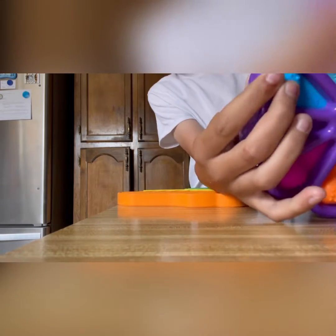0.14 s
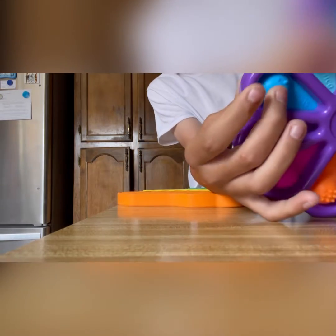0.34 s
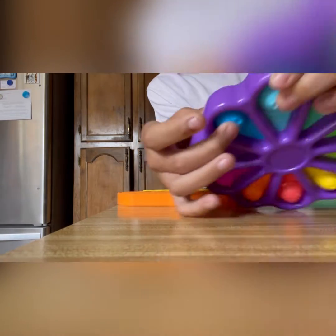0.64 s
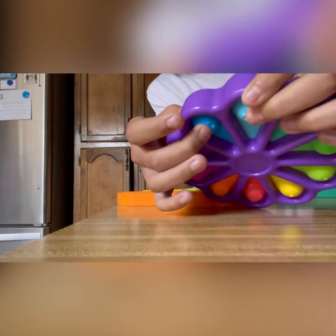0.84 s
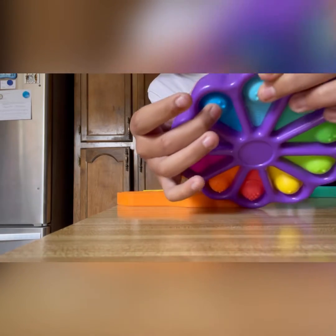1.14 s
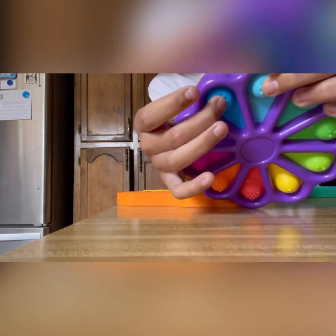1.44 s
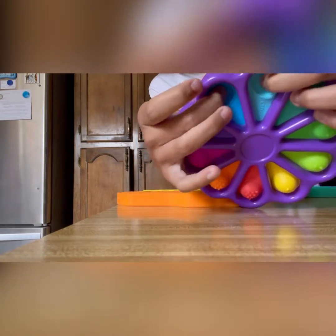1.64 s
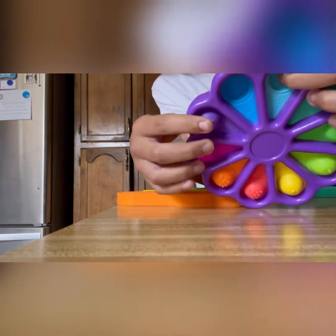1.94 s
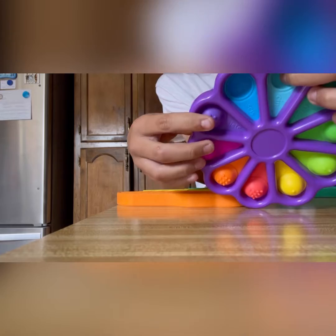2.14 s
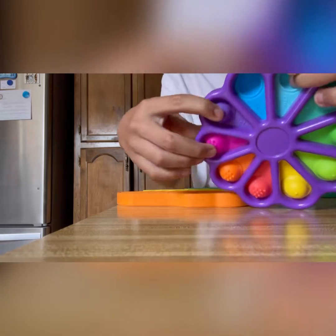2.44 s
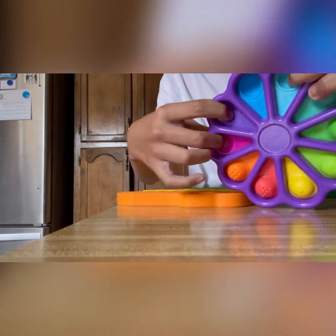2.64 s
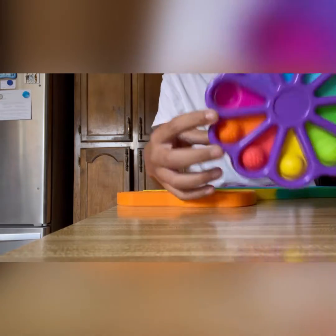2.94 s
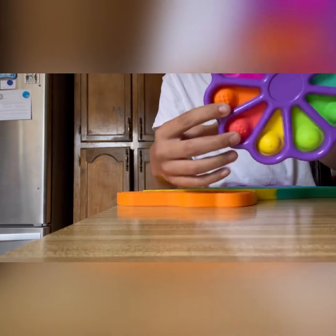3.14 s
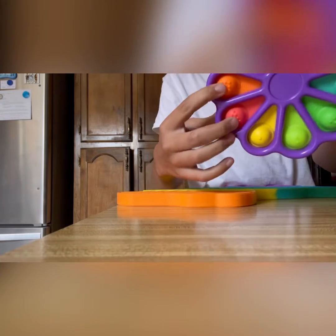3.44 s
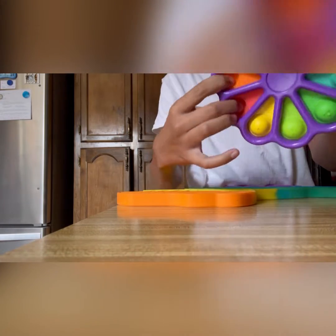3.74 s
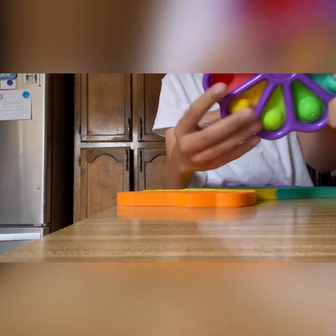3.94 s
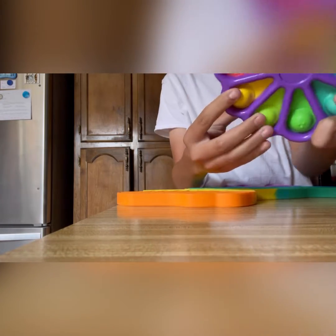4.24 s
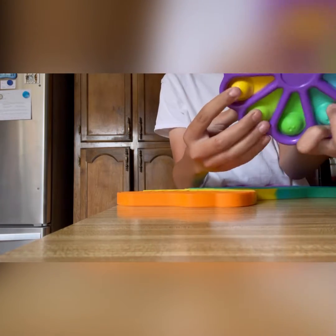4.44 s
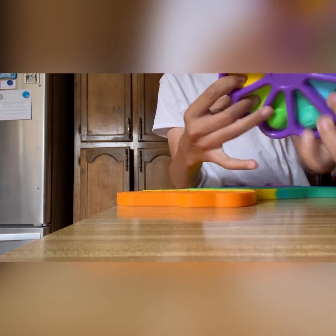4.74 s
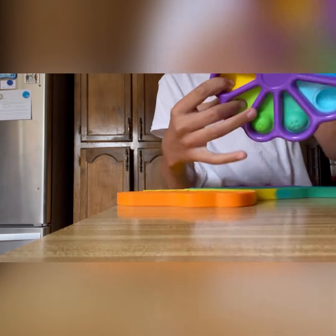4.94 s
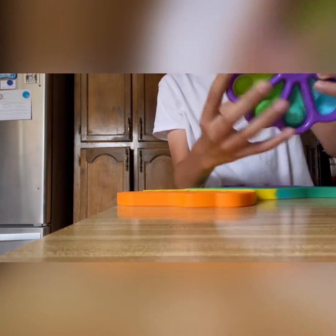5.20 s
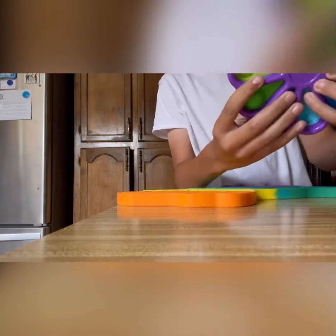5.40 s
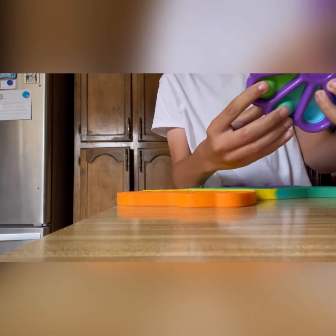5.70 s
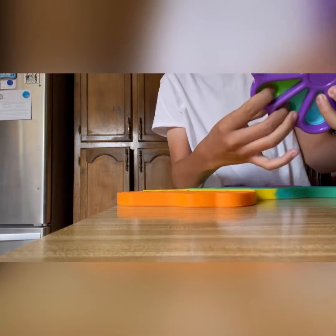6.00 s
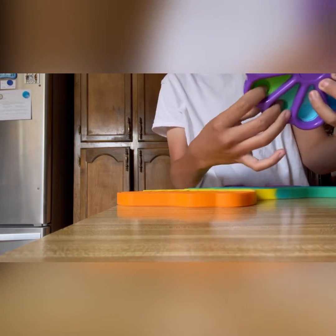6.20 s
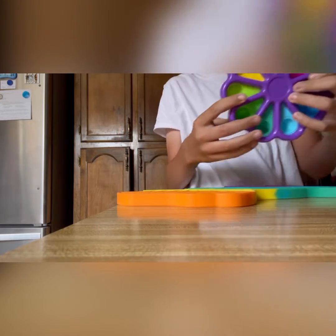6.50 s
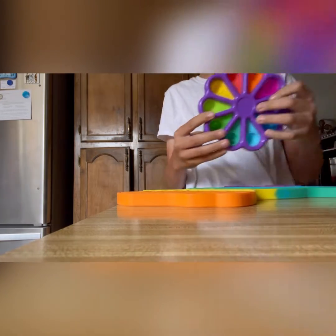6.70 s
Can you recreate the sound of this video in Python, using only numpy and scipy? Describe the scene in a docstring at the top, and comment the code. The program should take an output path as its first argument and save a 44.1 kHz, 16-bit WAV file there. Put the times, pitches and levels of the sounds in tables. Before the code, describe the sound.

Close to a phone microphone at a kitchen table, fingers handle a plastic fidget toy. A short low grumble and dull knock come first, then silicone bubbles snap through with sharp, hollow pops, often in tight pairs or triples separated by about a second. Small grainy skin scuffs and faint taps fill the gaps. A refrigerator hums softly and steadily behind, and the room adds a short, light tail.

```python
"""A kitchen table, where fingers press the silicone bubbles of a plastic fidget toy close to a phone.
Each flipping dome is a sum of short swings (a knock whose lows peak last) and a shaped noise burst (a crack),
and both excite the resonant modes of the frame, which also grumbles once. A grainy hiss has a steady floor,
swells around the pops and short scuffs of skin. A refrigerator hums as wavering sines and rumbles as
flickering noise bands; a short noise tail is the kitchen."""
import sys
import numpy as np
from scipy import signal
from scipy.fft import rfft, irfft
from scipy.io import wavfile
from scipy.ndimage import uniform_filter1d

SR = 44100
rng = np.random.default_rng(int(sys.argv[2]) if len(sys.argv) > 2 else 0)


def to_wav(sig):
    """Store sig (one row per channel, or 1-D mono) as 16-bit WAV at the path in sys.argv[1].

    Samples outside -1..1 are clipped; the rate is SR.
    """
    pcm = np.clip(np.atleast_2d(sig), -1, 1) * 32767
    pcm = np.round(pcm).astype(np.int16)
    wavfile.write(sys.argv[1], SR, pcm.T)  # frames by channels


N = 302526  # samples
TIME = np.arange(N) / SR  # s
HZ = np.maximum(np.arange(N // 2 + 1) * SR / N, 1)  # spectrum bins, kept above 0 for logarithms

# Motor lines of the refrigerator. Each row: frequency in Hz, mean level in dB rms.
HUM_LINES = [(59.2, -55.5), (215.3, -64.5), (296.1, -61), (355.3, -65), (414.5, -60), (473.7, -67.5),
             (532.9, -61), (651.4, -68), (769.8, -68.5), (947.5, -76.5), (1125, -78)]
# Spectrum of the refrigerator's rumble. Each row: frequency in Hz, relative density in dB per Hz.
RUMBLE_SPECTRUM = [(12, -36.5), (20, -18.5), (65, -4.5), (118, -11.5), (214, -4.5), (421, -6.5),
                   (485, -10.5), (543, -6.5), (701, -14.5), (1130, -19), (1450, -27.5), (1800, -45),
                   (8400, -54), (10200, -64.5), (11800, -52), (17000, -77)]
# Stereo lean of the rumble. Each row: frequency in Hz, left minus right in dB.
RUMBLE_BALANCE = [(60, -4.5), (110, 0), (200, 0), (380, 5), (700, 8), (1290, 7), (2380, 3), (4400, 2),
                  (8120, 1.5), (15000, -1)]
RUMBLE_DB = -52  # rms

# Reverberant tail of the kitchen. Each row: band centre in Hz, relative level in dB, decay by 60 dB in seconds.
KITCHEN_BANDS = [(123.6, -27.5, 0.11), (254, -25, 0.16), (520, -22.5, 0.59), (930, -21, 0.52),
                 (1980, -24, 0.29), (4040, -25, .4), (8460, -26, 0.36), (14000, -34.5, 0.48)]
SCATTER_HZ = 653  # above this the toy sounds different in every direction
SCATTER = 0.83  # how far the sound sent to the walls strays from the sound sent to the phone

# Spectrum of the grainy hiss. Each row: frequency in Hz, relative density in dB per Hz.
HISS_SPECTRUM = [(710, -32.5), (1200, -1), (3050, -8), (3720, -9.5), (6060, -23.5), (8000, -16),
                 (10100, -29.5), (11800, -18), (15600, -28.5), (17000, -53)]
# Steady floor of the hiss. The one row: dull hiss in dB, bright hiss in dB.
HISS_FLOOR_DB = (-84.5, -90)
# The hiss swells around the pops, holds and fades. Each row: start of the hold in seconds, hold in seconds,
# dull hiss in dB, bright hiss in dB, fade in dB per second.
HISS_SWELLS = [(.61, 0.11, -59, -66, 122), (1.66, 0.11, -59.5, -79.5, 147.5), (2.44, .1, -70, -79, 99),
               (2.7, .18, -56, -65, 120.5), (3.78, 0.073, -51.5, -63.5, 192), (4.84, .02, -57.5, -74, 60.5),
               (6.14, 0.11, -51, -63, 96), (6.65, .2, -79.5, -86, 101)]
# Short scuffs of a fingertip. Each row: middle in seconds, dull hiss in dB, bright hiss in dB,
# half length in seconds.
SCUFFS = [(0.017, -77.5, -72.5, 0.046), (0.146, -76, -93, .015), (0.287, -87, -64, 0.0029),
          (0.475, -67, -66.5, 0.033), (0.562, -58.5, -63.5, 0.052), (0.751, -51, -63.5, 0.016),
          (0.886, -70, -73, 0.042), (2.269, -68, -84, 0.0089), (2.309, -83, -82, 0.022),
          (2.887, -61, -61, 0.0044), (2.99, -74, -73, 0.0048), (3.09, -96, -86, 0.045),
          (3.34, -88, -83, 0.025), (3.528, -80, -82, 0.0095), (3.808, -46, -52.5, 0.0051),
          (3.866, -62, -67, .004), (4.029, -78, -74, 0.035), (4.302, -70, -84, 0.0052),
          (4.407, -64, -76, 0.019), (5.095, -88, -80, .02), (5.153, -57.5, -71, 0.016),
          (5.199, -62, -66.5, 0.023), (5.308, -86, -74.5, .05), (5.431, -72, -87, 0.0037),
          (5.618, -73, -77, 0.038), (6.296, -49, -76, 0.0063), (6.399, -66, -78, .004),
          (6.468, -79, -82, 0.022), (6.596, -73, -77, .005)]
HISS_SPLIT_HZ, SWELL_RISE_DB_PER_S = 4500, 259.5  # border of dull and bright; rise before each hold

# Modes of the plastic frame and its cups. Each row: frequency in Hz, relative gain in dB,
# decay by 60 dB in seconds.
FRAME_MODES = [(212, -10, 0.17), (270, -11, 0.17), (341, -10.5, 0.027), (447, -8.5, 0.09),
               (554.2, -14, 0.034), (782, -13.5, 0.065), (903, -14.5, 0.06), (1253, -12.5, 0.018),
               (1610, -13, 0.1), (2215, -17, 0.079), (2796, -22, 0.12), (3310, -9, 0.089),
               (3940, -18, 0.083)]
# Grumble of the frame as the toy is dragged through the grip. Each row: time in seconds, level in dB.
DRAG_LEVEL = [(0.42, -68), (0.506, -45), (0.528, -34), (0.564, -43), (0.614, -25.5), (0.624, -32.5),
              (0.698, -49.5), (0.772, -48.5), (0.78, -61)]

# The pops. Each row: start in seconds, body in dB, lean of the body in dB per octave, hump of its middle in dB,
# thud in dB, snap in dB, tick in dB, crack in dB, left minus right in dB, snap pitch in Hz before detuning.
# Levels are relative, ahead of the common gains; the side lean adds to the balance of the ports.
POPS = [(0.6065, -23, -2.5, -5, -21, -36, -36, -38.5, -4, 1890),
        (0.919, -41, 4, 0.5, -57, -56, -43.5, -44.5, 0.5, 2050),
        (1.4991, -53, -1, 7, -56, -54, -62, -54.5, 1.5, 2300),
        (1.5527, -17, -6.5, 0.5, -28.5, -9.5, -21, -12.5, 0.5, 2730),
        (1.5624, -8, 0.5, 8, -26, -6.5, -18, -17.5, 3.5, 2216),
        (1.61, -27.5, -7.5, -2, -33.5, -29, -30, -25, 1, 2220),
        (1.757, -19, -5, 4.5, -35, -26, -31, -26, 2, 2070),
        (1.7795, -38, -2, 5, -44, -37, -48, -41, 1, 2560),
        (2.1038, -53, -1, 13.5, -52, -52.5, -48.5, -59, 1, 2330),
        (2.39, -26.5, -8.5, -1, -21.5, -39.5, -46.5, -46.5, -3, 1894),
        (2.5022, -30.5, -8.5, 4, -28, -44, -51.5, -49.5, 0.5, 2090),
        (2.5826, -29, -9, 1, -33.5, -16.5, -18, -28, 0.5, 2880),
        (2.6083, -25.5, -1.5, 4.5, -25.5, -20.5, -20, -31.5, 2, 2800),
        (2.6417, -7.5, 6.5, 2.5, -26, -9.5, -16, -14, 1.5, 2140),
        (2.7174, -11.5, 3, 1.5, -31, -10.5, -13, -14, 1.5, 2175),
        (3.1421, -46, -7.5, 4, -54, -69, -83, -79, 6.5, 2250),
        (3.6206, -15.5, -5, 4, -39.5, -24, -23.5, -21, 0.5, 2637),
        (3.6402, -6, 1.5, -3.5, -25, -8.5, -16, -12.5, 0.5, 2423),
        (3.6659, -6, 6, 0.5, -32, -19, -19, -12, 2, 2155),
        (4.679, -19.5, 0.5, 3.5, -29, -25, -26.5, -25, 0.5, 2309),
        (4.716, -4, 0, -5.5, -25.5, -12, -14.5, -16, 0.5, 2240),
        (4.7344, -10, 6, 5.5, -40, -16.5, -25.5, -15, 1.5, 2180),
        (5.0474, -54, 0, -3, -55, -62, -62, -65, 8, 2730),
        (5.27, -52.5, -10, 0, -55, -80, -73, -69, 1, 2066),
        (5.972, -31.5, -4, -2.5, -36, -29, -30, -31.5, -1, 2700),
        (6.0235, -20, 6, 5, -28.5, -23.5, -27, -29, -0.5, 2550),
        (6.0417, -9, 5, 3, -27, -16, -20.5, -15, -2.5, 2250),
        (6.1196, -10, 2, -4, -69, -13, -20, -20.5, -0.5, 2190),
        (6.2821, -47, -2, 7, -66, -50.5, -52, -52, 2, 2607),
        (6.5486, -55, -5.5, 7, -63, -56, -72, -67, 3, 2390)]
# A flipping dome moves from tip to rim, so its lower swings peak later. The lowest swing comes first.
# Each row: typical time of the peak in seconds, sharpness of the peak as an exponent.
DOME_SWINGS = [(.005, 2.1), (0.0039, 2.5), (0.0037, 5), (.0027, 4.5), (0.0012, 2.2), (0.0012, 3.3),
               (0.001, 0.63)]
# Swings of the thud. Each row: frequency in Hz before detuning, level against the thud in dB.
THUD_SWINGS = [(105, -14), (218, -0.5)]
# Swings of the body, which leans about the middle one. Each row: frequency in Hz before detuning,
# share of the hump as a factor.
BODY_SWINGS = [(413.8, -.33), (775, .67), (1250, -.33)]
# Spectrum of the crack. Each row: frequency in Hz, relative density in dB per Hz.
CRACK_SPECTRUM = [(1180, -30), (2000, -6.5), (2390, -3.5), (3100, -17), (4280, -8), (6180, -12.5),
                  (7590, -18.5), (10100, -21.5), (12200, -20), (15800, -29.5), (17000, -41.5)]
TICK_HZ = 3491  # top swing, before detuning
DETUNE, SHIFT = 0.079, 0.31  # random spread of pitch (share) and of peak time (natural log)
GLIDE = 0.33  # each swing starts this share sharp and settles
CRACK_MS = 1  # time constant of the crack
RATTLE_DB, RATTLE_MS = -25, 20  # the silicone keeps rustling after the crack

# Stereo level of the toy at the phone's two ports. Each row: frequency in Hz, left minus right in dB.
PORT_BALANCE = [(60, -3), (110, -1), (200, -5.5), (380, -3), (700, 2.5), (1290, 2), (2380, 0.5),
                (4400, -0.5), (8120, 1.5), (15000, -1)]
# Stereo phase of the toy at the two ports. Each row: frequency in Hz, lead of the left in radians.
PORT_PHASE = [(0, 0.5), (1500, 0.54), (3500, 1.42), (6000, 3), (9000, -1.2), (17000, -16)]
MIC_LOW_HZ, TOP_HZ = 39.7, 16900  # pass band of the phone
THRESHOLD_DB, RATIO, SMOOTHING_S = -30, 1.1, 0.72  # gain control


def undb(db):
    """A level in decibels is twenty times the logarithm of an amplitude; this inverts it."""
    return 10 ** (np.asarray(db) / 20)


def level(x, db):
    """Scaling by the root mean square sets the level of a signal."""
    return x * undb(db) / np.sqrt(np.mean(x ** 2))


def read(table, hz):
    """Interpolation on a logarithmic frequency axis follows equal musical intervals."""
    table = np.array(table, float)
    return np.interp(np.log(hz), np.log(np.maximum(table[:, 0], 1)), table[:, 1])


def colour(x, gain):
    """Filtering is multiplication of the spectrum by a frequency response."""
    return irfft(rfft(x) * gain, N)


def brief(gain, span_s=.004):
    """Fading an impulse response out within a short span smooths its frequency response."""
    lag = np.minimum(TIME, N / SR - TIME)
    return rfft(irfft(gain, N) * np.exp(-(lag / span_s) ** 2))


def walk(rate):
    """Random levels, held for 1 / rate seconds and averaged twice, give a slow drift of spread near 1."""
    hold = int(SR / rate)
    steps = np.repeat(rng.standard_normal(N // hold + 1), hold)
    return 1.3 * uniform_filter1d(uniform_filter1d(steps, hold), hold)[:N]


def fridge_hum():
    """A motor radiates steady lines, here with slow random modulation of amplitude and phase."""
    hum = 0
    for hz, db in HUM_LINES:
        # standing waves reach the two ports with more phase difference at higher pitch
        port_phase = min(hz / 400, 1.4) * rng.standard_normal((2, 1))
        start = 2 * np.pi * rng.random() + port_phase
        amplitude = np.sqrt(2) * undb(db + 0.5 * walk(7.2))
        hum = hum + amplitude * np.sin(2 * np.pi * hz * TIME + start + 1.2 * walk(2.0))
    return hum


def fridge_rumble():
    """Broadband noise is a sum of overlapping bands, here half an octave apart and flickering separately."""
    rumble = 0
    lean = np.array([[.5], [-.5]]) * read(RUMBLE_BALANCE, HZ)
    gain = undb(read(RUMBLE_SPECTRUM, HZ) + lean)
    for hz in 20 * 2 ** np.arange(0, 10, .5):
        band = np.maximum(1 - abs(2 * np.log2(HZ / hz)), 0) ** .5
        noise = rng.standard_normal((2, N))
        # below 100 Hz the two channels grow alike
        noise[1] += max(1 - hz / 100, 0) * 4 * (noise[0] - .2 * noise[1])
        noise = noise / noise.std(axis=1, keepdims=True)
        rumble = rumble + undb(0.64 * walk(4.9)) * colour(noise, gain * band)
    return level(rumble, RUMBLE_DB)


def kitchen(x):
    """Reverberation is convolution with decaying noise, whose decay time depends on frequency."""
    t = np.arange(int(.7 * SR)) / SR
    hz = np.maximum(np.arange(len(t) // 2 + 1) * SR / len(t), 1)
    tail = 0
    for centre_hz, db, t60 in KITCHEN_BANDS:
        band = np.maximum(1 - abs(np.log2(hz / centre_hz)), 0) ** .5
        noise = irfft(rfft(rng.standard_normal((2, len(t)))) * band, len(t))
        tail = tail + undb(db - 60 * t / t60) * noise / np.sqrt(t60 * SR / 100)
    tail = tail * np.clip((t - .003) / 0.0027, 0, 1)  # first reflections build up
    return signal.fftconvolve(x[None], tail, axes=1)[:, :N]


def hiss_and_scuffs():
    """Modulated noise, partly alike left and right: a steady floor, swells around the pops, scuffs of skin."""
    start, hold, *swell_db, fade = np.transpose(HISS_SWELLS)
    since = TIME - start[:, None]
    rise_db = SWELL_RISE_DB_PER_S * np.minimum(since, 0)
    fade_db = fade[:, None] * np.maximum(since - hold[:, None], 0)
    swells = undb(rise_db - fade_db)
    middle, *scuff_db, half = np.transpose(SCUFFS)
    bumps = np.exp(-((TIME - middle[:, None]) / half[:, None]) ** 2)
    bright = 1 / (1 + (HISS_SPLIT_HZ / HZ) ** 8)
    out = 0
    for share, swell, scuff, floor in zip((1 - bright, bright), swell_db, scuff_db, HISS_FLOOR_DB):
        noise = rng.standard_normal((3, N))
        # the first noise is common to both channels
        hiss = colour(noise[1:] + 0.37 * noise[0], share * undb(read(HISS_SPECTRUM, HZ)))
        grain = undb(1.8 * walk(40) + 2.5 * walk(500))
        envelope = undb(floor) + undb(swell) @ swells + undb(scuff) @ bumps
        out = out + level(hiss * grain, 0) * envelope
    return out


def frame(push):
    """A resonant body is a bank of damped modes, each with gain near 1 at its centre before its own dB."""
    out = 0
    for hz, db, t60 in FRAME_MODES:
        pole = np.exp(2j * np.pi * hz / SR - np.log(1000) / (t60 * SR))
        ring = signal.lfilter([1], [1, -pole], push).imag
        out = out + undb(db) * 2 * (1 - abs(pole)) * ring
    return out


def drag():
    """Irregular slips under friction, modelled as uneven low noise, shake the modes of the frame."""
    slips = rng.standard_normal(N) * undb(2.8 * walk(300))
    slips = colour(slips, 1 / (1 + (HZ / 900) ** 4) / (1 + (220 / HZ) ** 4))
    seconds, db = np.transpose(DRAG_LEVEL)
    inside = (TIME > seconds[0]) & (TIME < seconds[-1])
    return level(frame(slips) + .1 * slips, 0) * undb(np.interp(TIME, seconds, db)) * inside


def dome_swings(hz):
    """A snapping shell gives brief swings that start sharp and settle, the lower ones typically peaking later."""
    t = np.arange(int(.06 * SR)) / SR
    peak_s, sharp = np.transpose(DOME_SWINGS)[:, :, None]
    detune, shift, start = rng.standard_normal((3, len(DOME_SWINGS), 1))
    rise = t / (peak_s * np.exp(SHIFT * shift))
    glided = t + GLIDE * peak_s * (1 - np.exp(-t / peak_s))
    turns = hz[:, None] * (1 + DETUNE * detune) * glided
    return (rise * np.exp(1 - rise)) ** sharp * np.sin(2 * np.pi * turns + 2 * start)


def pops():
    """Sudden buckling of a dome radiates a knock and a noisy crack, which together excite the frame."""
    t_ms = 1000 * np.arange(int(.06 * SR)) / SR
    knock, crack = np.zeros((2, N)), np.zeros((2, N))
    burst = (t_ms / CRACK_MS) * np.exp(-t_ms / CRACK_MS)
    burst = burst + undb(RATTLE_DB) * np.exp(-t_ms / RATTLE_MS)
    thud_hz, thud = np.transpose(THUD_SWINGS)
    body_hz, hump_share = np.transpose(BODY_SWINGS)
    octaves = np.log2(body_hz / body_hz[1])
    for s, body_db, lean, hump_db, thud_db, snap_db, tick_db, crack_db, pan_db, snap_hz in POPS:
        hz = np.array([*thud_hz, *body_hz, snap_hz, TICK_HZ])
        bodies_db = body_db + hump_db * hump_share + lean * octaves
        swing_db = [*(thud_db + thud), *bodies_db, snap_db, tick_db]
        side = undb(np.array([[pan_db], [-pan_db]]) / 2)
        at = slice(int(s * SR), int(s * SR) + len(t_ms))
        knock[:, at] += side * (undb(swing_db) @ dome_swings(hz))
        crack[:, at] += side * undb(crack_db) * rng.standard_normal(len(t_ms)) * burst
    shape = abs(brief(undb(read(CRACK_SPECTRUM, HZ))))
    crack = colour(crack, undb(8.5) * shape / np.sqrt(np.mean(shape ** 2)))
    return undb(1.0) * knock + undb(9.0) * frame(knock + crack) + crack


def scene():
    """Sound fields superpose: direct sound of the toy, its reverberation, the hiss and the refrigerator."""
    toy = pops() + drag()
    # the two ports of the phone hear the near toy with their own level and phase
    phase = np.interp(HZ, *np.transpose(PORT_PHASE))
    left_over_right = undb(read(PORT_BALANCE, HZ)) * np.exp(1j * phase)
    ports = left_over_right ** np.array([[.5], [-.5]])
    # the walls get the highs from all sides of the toy, which blurs their pitches in the tail
    middle = toy.mean(axis=0)
    highs = colour(middle, 1 / (1 + (SCATTER_HZ / HZ) ** 4))
    sent = middle + SCATTER * highs * (1.21 * walk(2000) - 1)
    background = fridge_hum() + fridge_rumble()
    return background + kitchen(sent) + hiss_and_scuffs() + colour(toy, brief(ports))


def record(dry):
    """Compression lowers the gain as smoothed power passes a threshold; tanh rounds peaks, filters cut both ends."""
    power = uniform_filter1d(np.mean(dry ** 2, axis=0), int(0.014 * SR))
    keep = np.exp(-1 / (SMOOTHING_S * SR))
    held = signal.lfilter([1 - keep], [1, -keep], power)
    excess = undb(THRESHOLD_DB) ** 2 / (held + 1e-12)
    gain = np.minimum(excess ** ((1 - 1 / RATIO) / 2), 1)
    low_cut = signal.butter(2, MIC_LOW_HZ, "high", fs=SR, output="sos")
    top_cut = signal.ellip(10, .2, 70, TOP_HZ, fs=SR, output="sos")
    heard = signal.sosfilt(low_cut, dry * gain)
    return signal.sosfilt(top_cut, np.tanh(heard))


dry = scene()
out = record(dry)
to_wav(out)
```